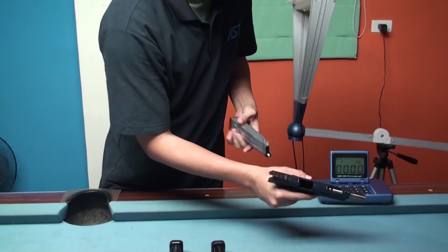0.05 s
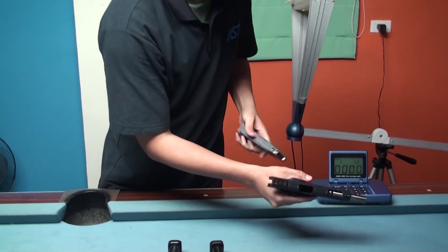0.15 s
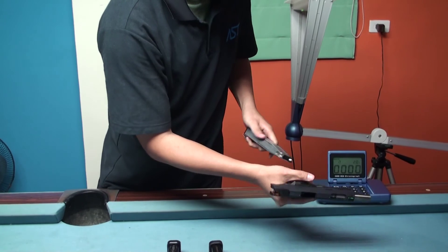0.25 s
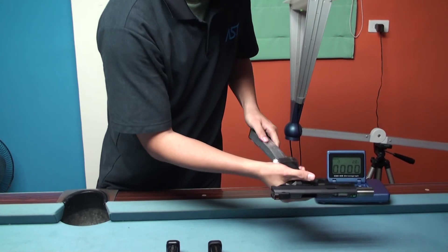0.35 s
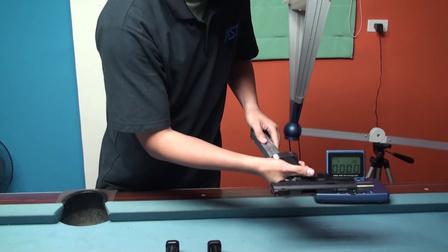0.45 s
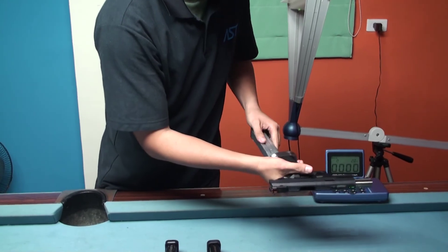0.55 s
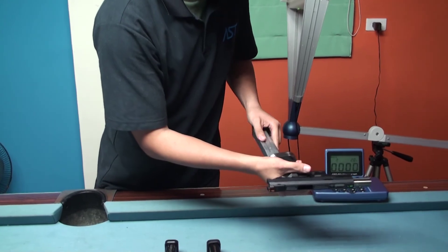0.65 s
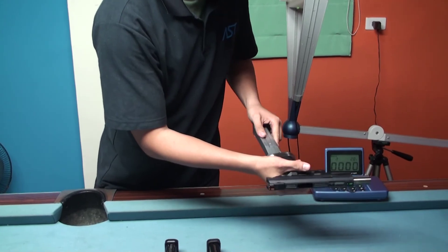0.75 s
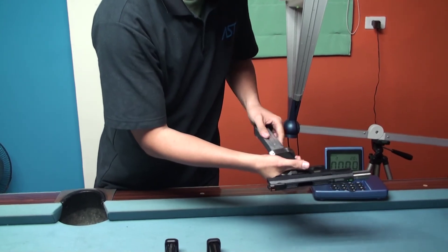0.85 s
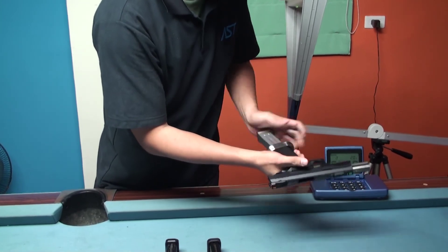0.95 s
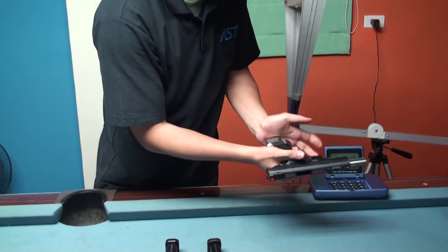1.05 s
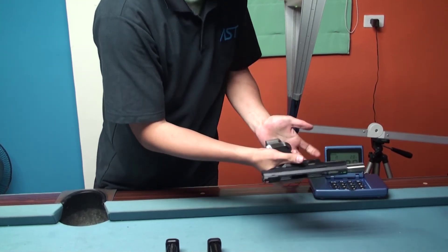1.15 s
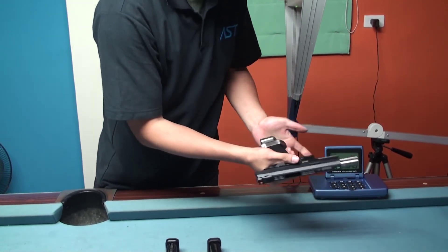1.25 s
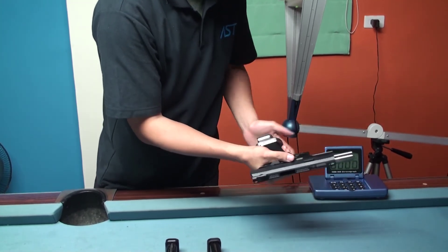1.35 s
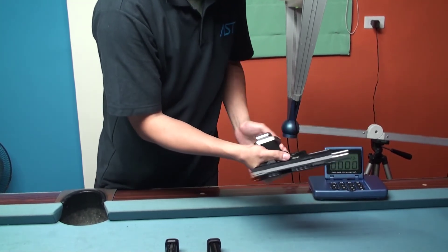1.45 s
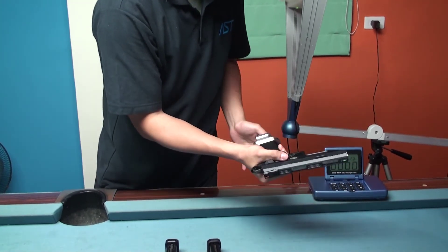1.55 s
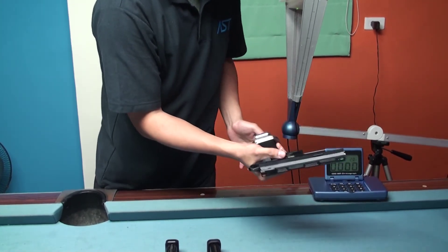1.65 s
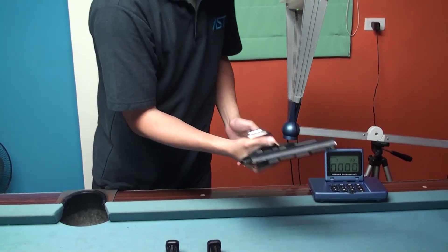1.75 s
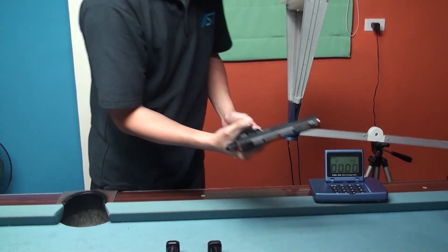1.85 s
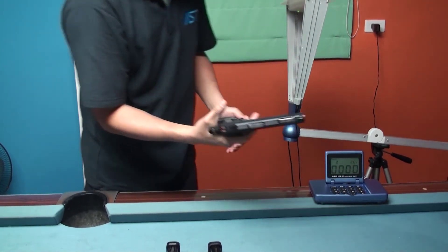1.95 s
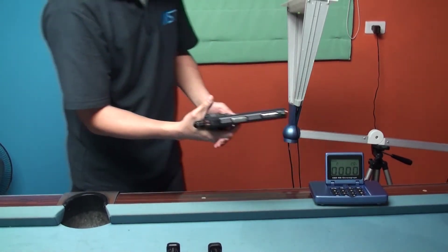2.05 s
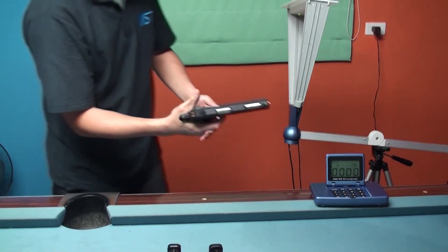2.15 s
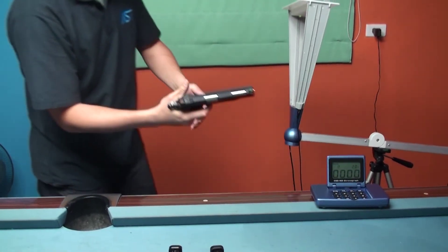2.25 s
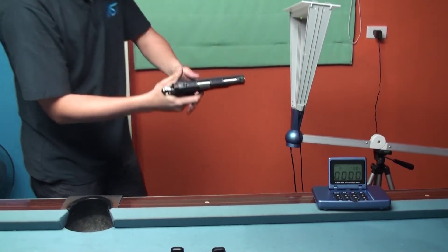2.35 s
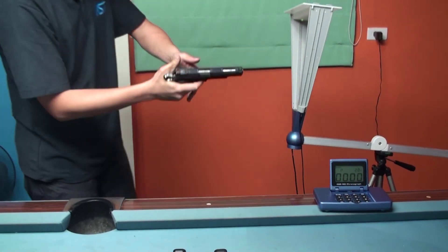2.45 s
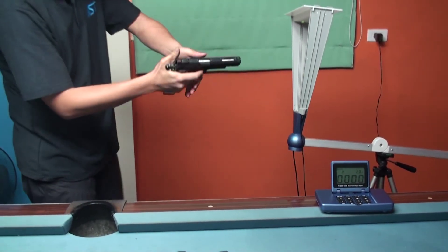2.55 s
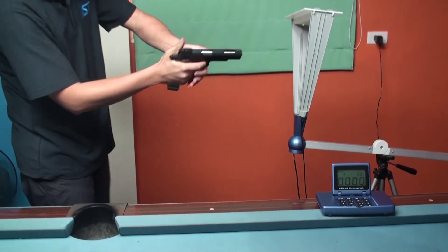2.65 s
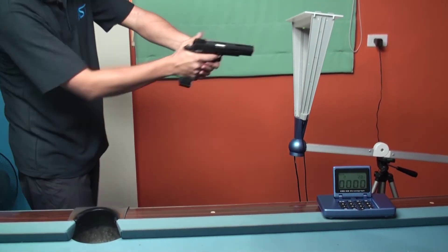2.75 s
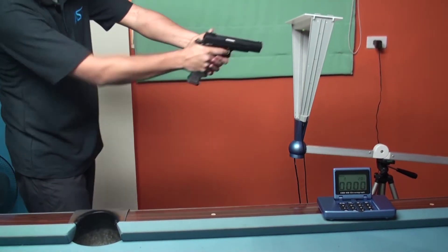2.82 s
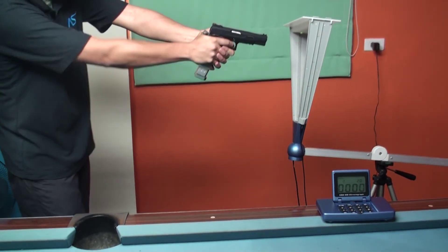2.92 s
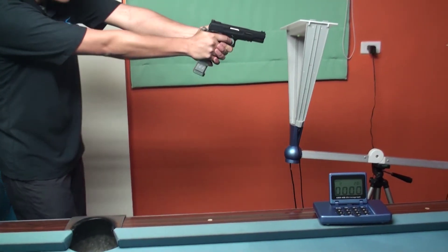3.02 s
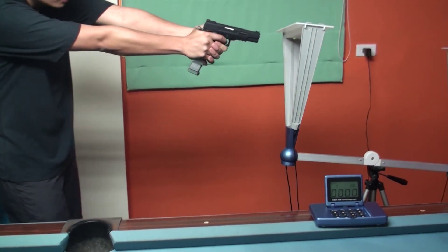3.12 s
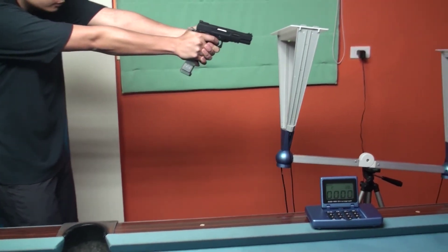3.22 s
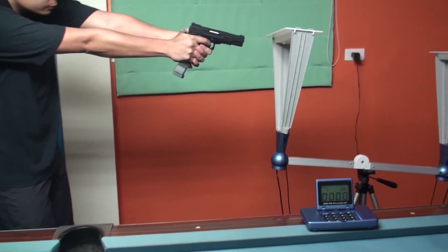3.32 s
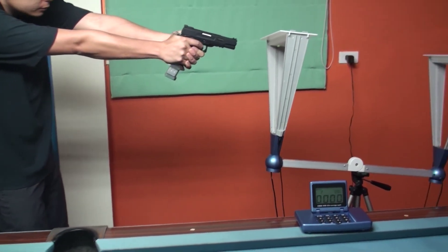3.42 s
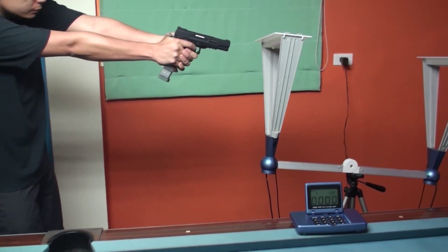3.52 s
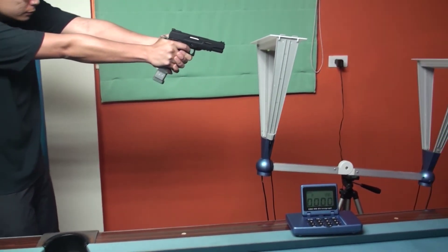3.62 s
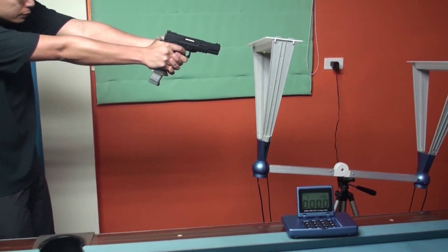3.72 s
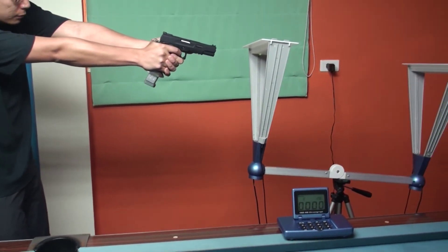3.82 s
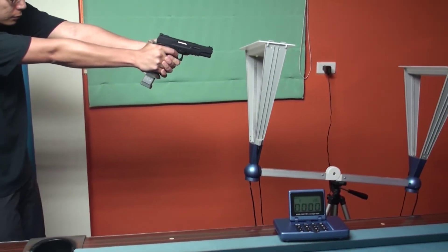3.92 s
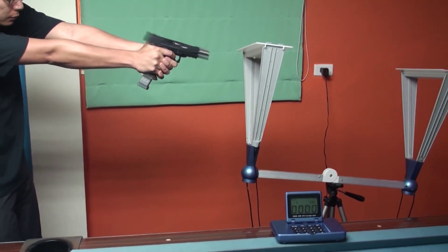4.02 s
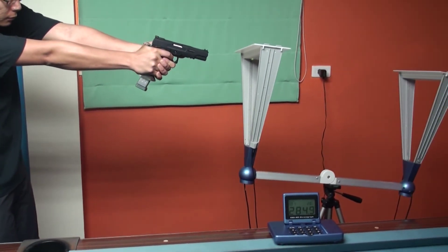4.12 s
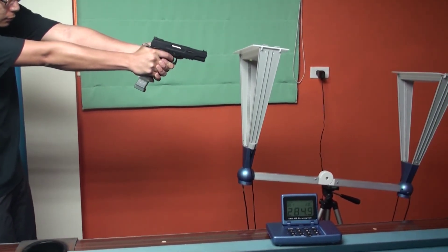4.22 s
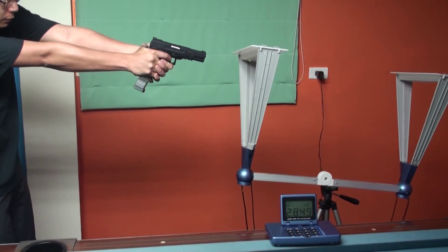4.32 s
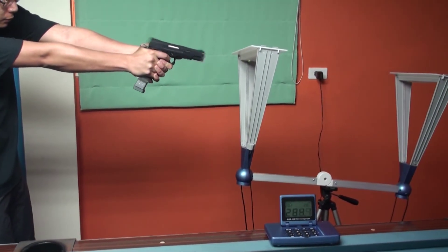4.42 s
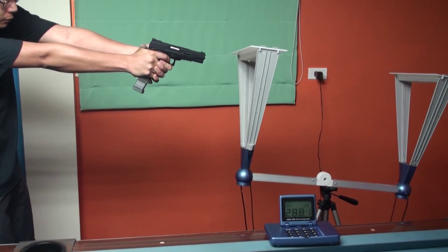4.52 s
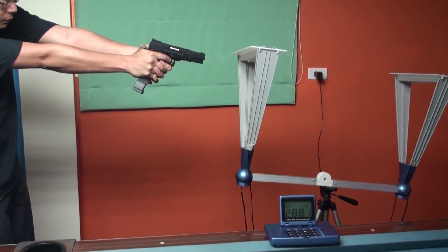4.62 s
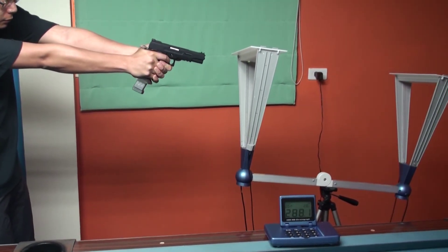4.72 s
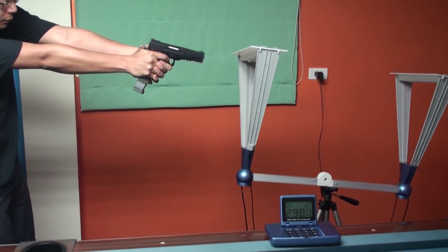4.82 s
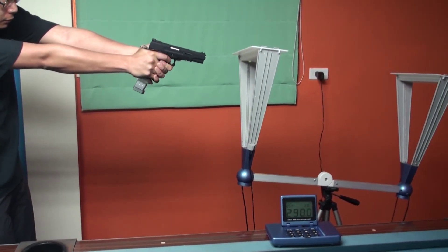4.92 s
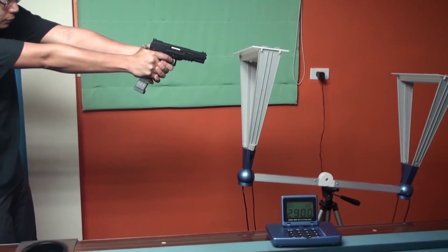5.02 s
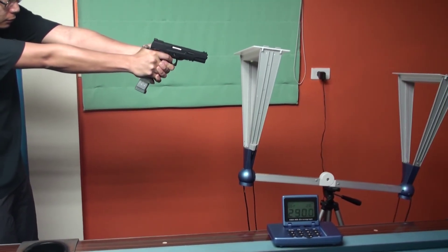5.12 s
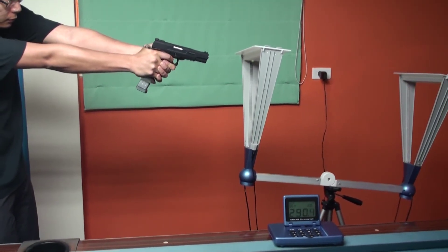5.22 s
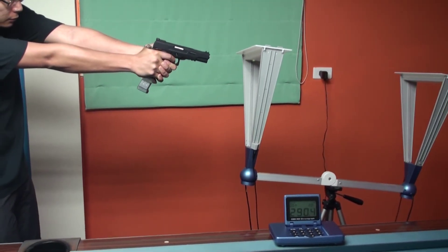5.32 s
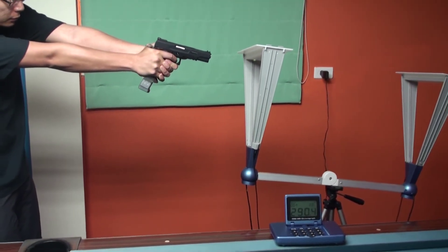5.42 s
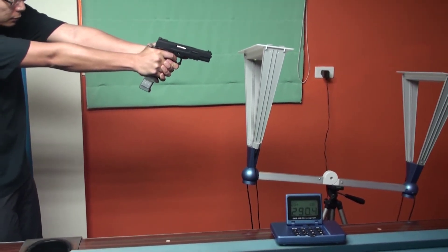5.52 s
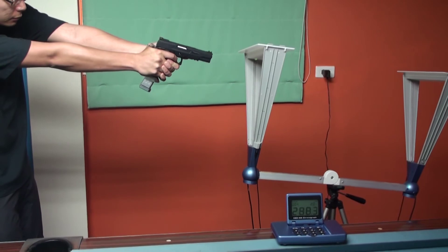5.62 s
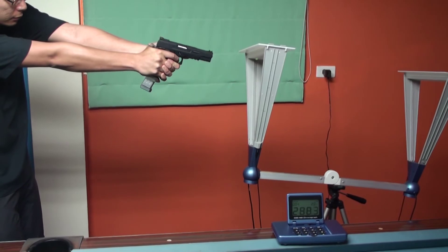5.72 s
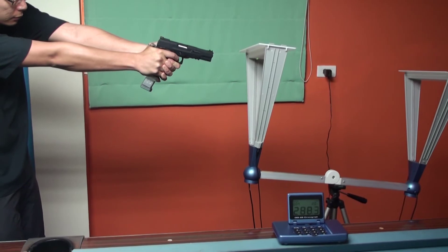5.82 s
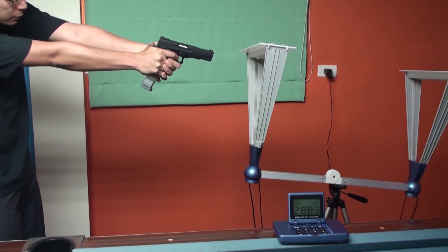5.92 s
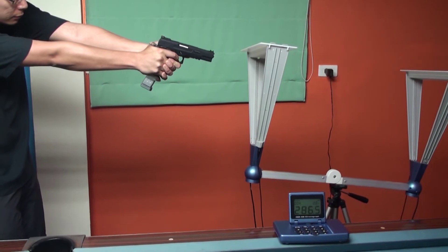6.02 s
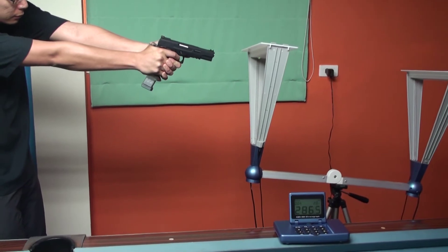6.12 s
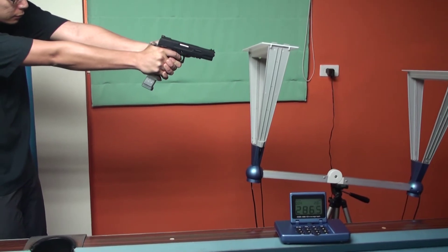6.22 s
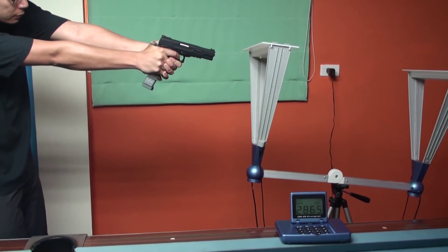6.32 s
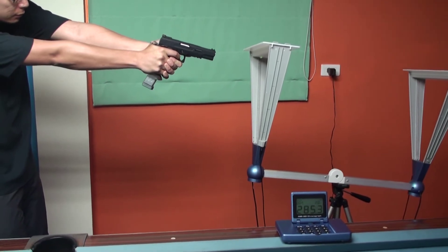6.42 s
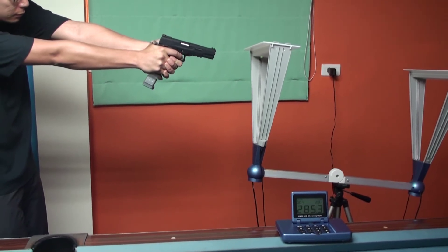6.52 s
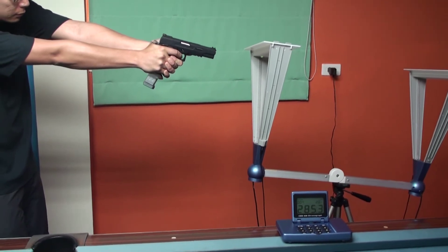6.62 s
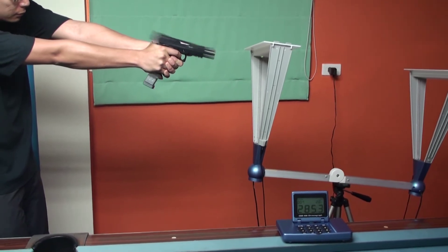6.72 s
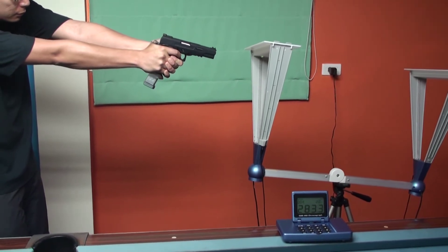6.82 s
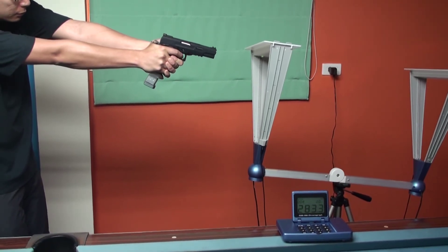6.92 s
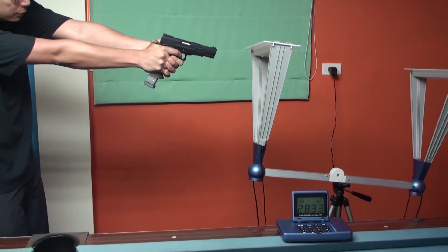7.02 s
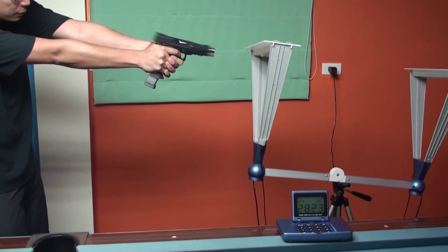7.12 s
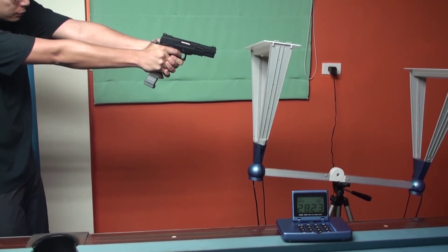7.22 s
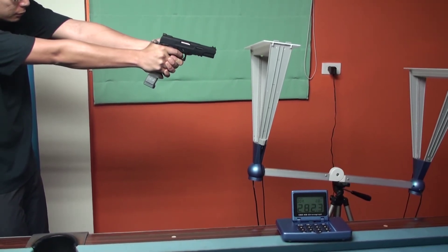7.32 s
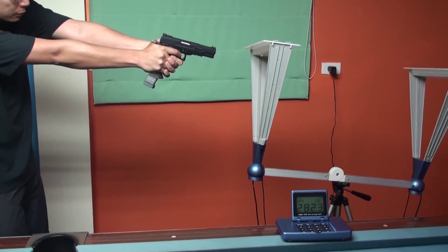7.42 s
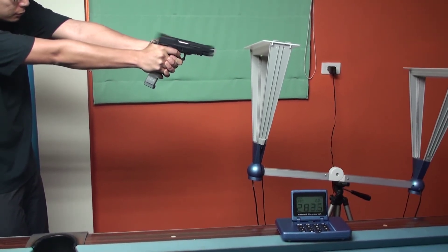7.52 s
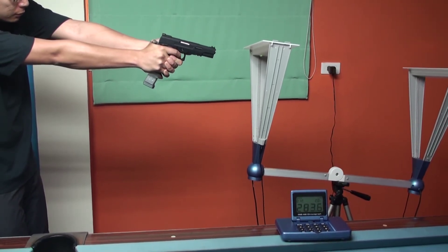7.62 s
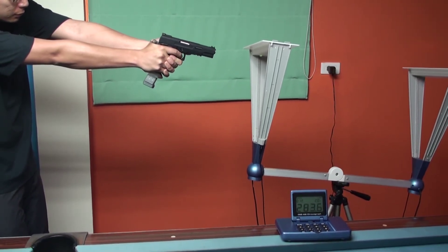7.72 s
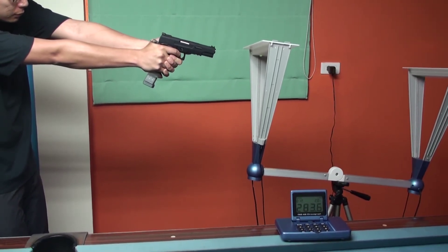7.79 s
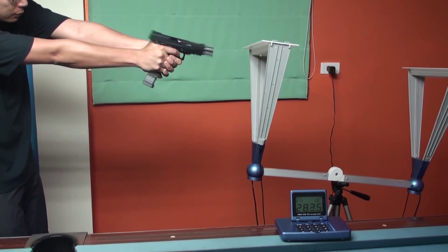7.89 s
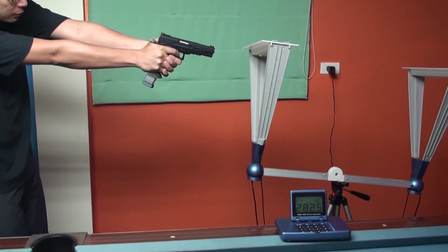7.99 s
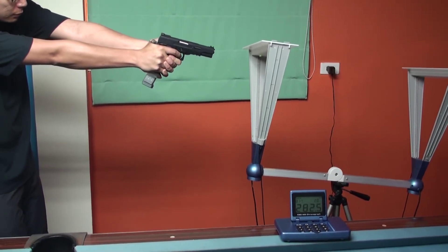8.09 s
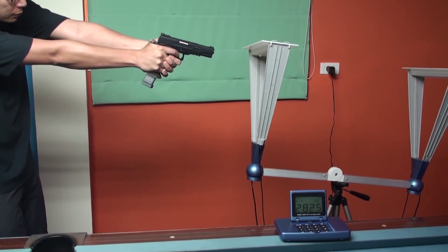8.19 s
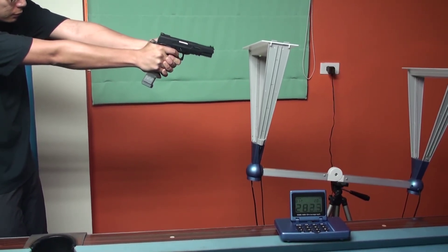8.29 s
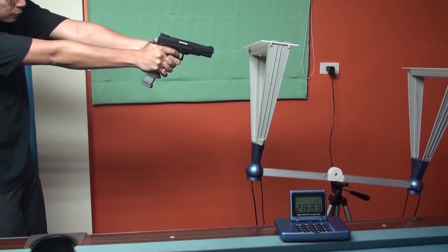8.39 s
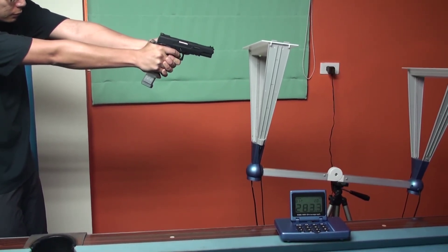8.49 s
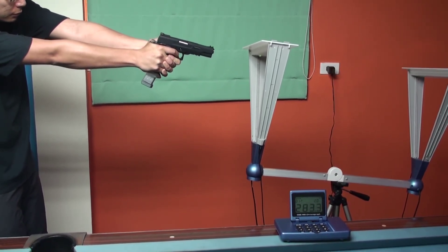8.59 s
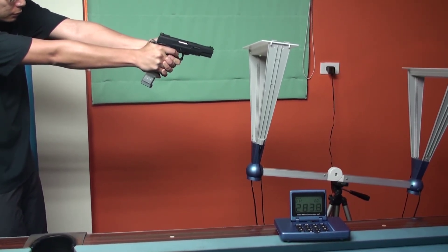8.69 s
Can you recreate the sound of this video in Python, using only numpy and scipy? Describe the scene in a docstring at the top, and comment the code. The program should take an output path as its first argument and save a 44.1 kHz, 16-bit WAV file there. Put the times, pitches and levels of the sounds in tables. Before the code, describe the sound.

After clicks of a magazine and slide, a gas airsoft pistol fires repeatedly, each pop carrying a bright clack and room echo.

```python
"""A gas airsoft pistol fires thirteen shots in a hard-walled room, after it is loaded and its slide dropped.
Each shot is a hammer click, a blast of expanding gas and impacts of the slide, which excite the metal's
normal modes; the blasts weaken as the gas cools. Room noise, a brief hum and sleeves lie underneath.
A fast limiter passes the first crack and flattens the bang, so the reverberation swells up behind it."""
import sys
import numpy as np
from scipy import signal
from scipy.fft import rfft, irfft, next_fast_len
from scipy.io import wavfile
from scipy.ndimage import uniform_filter1d

SR = 44100
rng = np.random.default_rng(int(sys.argv[2]) if len(sys.argv) > 2 else 0)


def master(y):
    """Save y as 16-bit WAV."""
    cut = np.clip(np.atleast_2d(y).T, -1, 1)
    pcm = np.round(cut * 32767)  # scale
    wavfile.write(sys.argv[1], SR, pcm.astype(np.int16))


N = 385875

# Spectra of room noise and rubbing cloth. Each row: frequency in Hz, relative level in dB.
AIR_SPECTRUM = [(15, -47.5), (25, -11), (64, -19), (108, -1.5), (190, 2.5), (217, -4), (285, 6),
                (335, -2.5), (531, -7), (575, -9.5), (887, -9), (1370, -12.5), (1560, -14.5), (3720, -23),
                (16000, -41)]
CLOTH_SPECTRUM = [(500, -11), (2000, -2), (4000, -3.5), (7000, -3), (11500, -5.5), (16000, -18)]
# Sleeves brushing as the arms rise. Each row: start in seconds, level in dB, decay time in seconds.
SLEEVE_BRUSHES = [(1.75, -54, 0.23), (2.08, -50, .19), (2.565, -41.5, .06), (2.801, -55.5, 0.26)]
# Early reflections. Each row: delay in seconds, relative gain.
REFLECTIONS = [(.0012, .6), (.0050, 0.29), (.0093, 0.38), (.0125, -0.34), (0.0146, 0.43), (0.022, 0.13)]
# Reverberation time of the room. Each row: frequency in Hz, T60 in seconds.
REVERB_TIMES = [(60, 0.32), (150, 0.62), (400, 0.59), (1000, 0.5), (2800, 0.49), (7000, 0.52),
                (11000, 0.45), (16000, 0.35)]
# Normal modes of room and pistol. Each row: frequency in Hz, relative level in dB, T60 in seconds.
STANDING_WAVES = [(138.9, -8, 0.79), (150.1, 2, 0.69), (279, 0.5, 0.51), (337.7, -2.5, 0.54),
                  (408, -10, 0.94), (668, 8.5, 0.34), (772, -23.5, 0.38), (840, -17, 0.33),
                  (878, 0.5, 0.26), (1078, 7.5, 0.46), (1610, -12, 0.74)]
METAL_MODES = [(2406, -12.5, 0.84), (2550, -7, 0.72), (2960, -4, .25), (3210, -12, 1), (4517, -22, 0.233),
               (4770, -26, 0.37), (5560, -12, .19), (6077, -14.5, 0.218), (6515, -15, .2),
               (6600, -11, 0.17), (7240, -13.5, .35), (7560, 22.5, 0.26), (8400, 20.5, 0.2),
               (8500, -10, 0.227), (9458, -8.5, .23), (11190, -11, .2)]
# Diffuse-field coherence between the microphones. Each row: frequency in Hz, coherence from 0 to 1.
COHERENCE = [(60, 0.2), (200, 0.27), (600, 0.53), (1400, 0.43), (7000, 0.35), (15000, 0.23)]
# The left channel is quieter, with little treble above about 11.5 kHz.
# Each row: frequency in Hz, level in dB relative to the right.
LEFT_BALANCE = [(60, -4), (110, -9), (200, -14), (380, -10), (700, -7.5), (1300, -6.5), (2400, -5.5),
                (8000, -5.5), (9800, -2), (11200, -1), (11900, -18), (16000, -24)]
# Impacts of loading. Each row: start in seconds, level in dB, main resonance in Hz, its lift in dB.
LOADING_KNOCKS = [(0.1196, -28, 4140, 14), (0.227, -37, 4130, 7), (0.5164, -25.5, 2590, 2),
                  (0.5252, -31.5, 6400, 15), (0.808, -38, 3800, 7), (0.8624, -19, 2150, 18),
                  (0.908, -19.5, 3650, 5), (0.9976, -21, 1126, 17), (1.0170, -21, 8660, 20),
                  (1.0231, -20, 3870, 10), (1.058, -10.5, 3400, 7), (1.078, -1, 2950, 5.5),
                  (1.5028, -4, 2390, 0), (1.5222, -0.5, 2410, 11), (1.839, -33, 3500, 4),
                  (2.93, -40, 3420, 11)]
# Magazine sliding up the grip, then slide along its rails.
# Each row: start in seconds, length in seconds, level in dB, rise over the stroke in dB.
LOADING_SCRAPES = [(.91, 0.19, -40.5, 8), (1.489, 0.011, -32, 11)]
# Spectra of a loading knock, the slide's clack and the blast. Each row: frequency in Hz, relative dB.
KNOCK_SPECTRUM = [(100, -31), (700, -16), (1300, -5.5), (1700, -4), (2500, 0), (4200, 0), (5500, 1),
                  (7300, -1), (8300, 0), (9500, -4), (11500, -3), (13000, -13), (16000, -17)]
CLACK_SPECTRUM = [(300, -29), (2000, -16), (4500, -11), (5800, -1), (6700, 12.5), (7500, 5), (9000, -7.5),
                  (11500, 4), (16000, -39)]
BLAST_SPECTRUM = [(30, -2), (65, -19), (105, -1), (150, 0), (200, -2), (280, 5.5), (400, 3.5), (570, 6.5),
                  (1100, 3.5), (1800, 1.5), (3000, 1.5), (7000, 4.5), (12000, 2.5), (16000, -1.5)]
# Slide impacts in one shot. Each row: nominal delay after the blast in seconds, relative level in dB.
SLIDE_CYCLE = [(.0005, 6.5), (.0095, 0), (0.0152, 0.5), (0.0225, -4), (0.038, 0)]
# The shots. Each row: time of the blast in seconds, level of the hammer click in dB.
SHOT_SEQUENCE = [(4.0519, -14), (4.4195, -17), (4.8178, -23), (5.2052, -10), (5.5890, -15), (5.9944, -32),
                 (6.3939, -22), (6.7603, -26), (7.1349, -33), (7.5282, -14), (7.9123, -22), (8.279, -36),
                 (8.674, -32)]

COLD_DB, WARM_DB, COOLING_SHOTS = -3.5, 12, 4.5  # the warm gas's excess level falls by 1/e in 4.5 shots
SLIDE_DB_PER_GAS_DB, SLIDE_TOP_DB, FIRST_SLIDE_DB = 2.1, 3, -20  # the first shot's clack is faint
CONTACT_S, RATTLE_S = 0.0021, 0.0054  # a harder knock rattles longer
GENTLE_TILT_DB, FORCE_TILT_DB = -5.5, 9  # per octave above 1 kHz: a harder knock is brighter


def amp(db):
    """Amplitude ratio of a level in decibels."""
    return 10 ** (np.asarray(db) / 20)


def unit_rms(x):
    """Normalisation to unit mean power."""
    return x / np.sqrt(np.mean(x ** 2) + 1e-20)


def curve_at(points, hz):
    """Interpolation on a logarithmic frequency axis."""
    frequencies, values = np.transpose(points)
    return np.interp(np.log(hz + 1), np.log(frequencies + 1), values)


def add(mix, start_s, sound):
    """Superposition: a sound adds to the mix from its start time."""
    part = mix[round(start_s * SR):][:len(sound)]
    part += sound[:len(part)]


def convolve(x, response):
    """Convolution: the output of a linear system with a one- or two-channel impulse response."""
    return signal.fftconvolve(np.atleast_2d(x), np.atleast_2d(response), axes=1)[:, :N]


def colour(db_at, size=4096):
    """Minimum-phase response of unit energy, with the spectral shape db_at(Hz)."""
    log_gain = np.log(amp(db_at(abs(np.fft.fftfreq(size, 1 / SR)))))
    spectrum = np.exp(np.conj(signal.hilbert(log_gain)))
    response = np.fft.ifft(spectrum).real[:size // 2]
    return response / np.linalg.norm(response)


def burst(decay_s):
    """Broadband transient: decaying noise whose energy is proportional to its decay time."""
    age = np.arange(int(7 * decay_s * SR) + 2) / (decay_s * SR)
    white = np.random.default_rng(rng.integers(2 ** 30)).standard_normal(len(age))
    rush = white * np.exp(-age) * (1 - np.exp(-10 * age))
    for _ in range(4):  # keeping only the phase flattens the spectrum
        phase = np.angle(rfft(rush, 2 * len(age)))
        rush = irfft(np.exp(1j * phase))[:len(age)]
    return rush * np.sqrt(decay_s * SR / 2)


def ring(modes):
    """Free vibration: a sum of damped normal modes, with unit energy."""
    t = np.arange(SR) / SR
    sound = sum(amp(db - 60 * t / t60) * np.sin(2 * np.pi * (hz * t + rng.random()))
                for hz, db, t60 in modes)
    return sound / np.linalg.norm(sound)


def swell(start_s, rise_s, decay_s):
    """Envelope with a smooth rise to one and an exponential decay."""
    age = np.arange(N) / SR - start_s
    rise = np.sin(np.pi / 2 * np.clip(age / rise_s, 0, 1)) ** 2
    return rise * np.exp(-np.maximum(age - rise_s, 0) / decay_s)


def diffuse(pair):
    """Partial coherence: sound from all sides is partly alike at two close microphones."""
    common, separate = rfft(pair)
    coherence = np.clip(curve_at(COHERENCE, np.fft.rfftfreq(pair.shape[1], 1 / SR)), 0, 1)
    left = coherence * common + np.sqrt(1 - coherence ** 2) * separate
    return irfft([left, common], pair.shape[1])


def diffuse_noise(spectrum):
    """Stationary noise of a diffuse field, with a given spectral shape."""
    white = diffuse(rng.standard_normal((2, N)))
    gain = amp(curve_at(spectrum, np.fft.rfftfreq(N, 1 / SR)))
    return unit_rms(irfft(rfft(white) * gain, N))


def hum(pitch_hz=188, waver_hz=4, peak_db=-48.5):
    """A low tone swells once and fades; random frequency modulation makes it waver."""
    waver = unit_rms(uniform_filter1d(rng.standard_normal(N), size=4000))
    tone = unit_rms(np.sin(2 * np.pi * np.cumsum(pitch_hz + waver_hz * waver) / SR))
    return amp(peak_db) * swell(start_s=2.57, rise_s=0.1, decay_s=0.8) * tone


def sleeves(rise_s=0.17):
    """Friction of cloth gives broadband noise that swells with each brush."""
    rubbing = sum(amp(db) * swell(start_s, rise_s, decay_s) for start_s, db, decay_s in SLEEVE_BRUSHES)
    return rubbing * diffuse_noise(CLOTH_SPECTRUM)


def reverberation(build_s=0.0014, modes_db=-22, lowest_hz=85):
    """Reflections grow denser and decay exponentially in each band, over the room's standing waves."""
    t = np.arange(SR) / SR
    density = np.minimum(0.13 + 8 * t, 1)
    arrivals = rng.standard_normal((2, SR)) * (rng.random((2, SR)) < density)
    hz, age, bands = signal.stft(diffuse(arrivals) / np.sqrt(density), SR, nperseg=256)
    decay = amp(-60 * age / curve_at(REVERB_TIMES, hz)[:, None])
    tail = signal.istft(bands * decay, SR, nperseg=256)[1][:, :SR]
    bass_cut = signal.butter(2, lowest_hz, "high", fs=SR, output="sos")
    tail = signal.sosfilt(bass_cut, tail)  # a small room holds little deep bass
    rise = 1 - np.exp(-(t / build_s) ** 2)
    return rise * (tail / np.linalg.norm(tail[1]) + amp(modes_db) * ring(STANDING_WAVES))


def room(x, tail, early_db, tail_db):
    """Multipath propagation: direct sound, early reflections off table and walls, reverberant tail."""
    response = amp(tail_db) * tail
    response[:, 0] += 1
    for delay_s, gain in REFLECTIONS:
        for side in response:
            side[round((delay_s + rng.uniform(0, 0.0002)) * SR)] += amp(early_db) * gain
    return convolve(x, response)


def metal(blows, ring_db):
    """Impact excitation: each blow is followed by the ringing of the pistol's metal parts."""
    return blows + amp(ring_db) * convolve(blows, ring(METAL_MODES))[0]


def knocks(width_hz=230):
    """Impacts as magazine and slide are tapped and lock: greater force gives a longer, brighter knock."""
    blows = np.zeros(N)
    for start_s, db, resonance_hz, lift_db in LOADING_KNOCKS:
        force = amp(db)
        tilt_db = GENTLE_TILT_DB + FORCE_TILT_DB * force
        contact = colour(lambda hz: curve_at(KNOCK_SPECTRUM, hz)
                         + tilt_db * np.log2(np.maximum(hz, 1000) / 1000)
                         + lift_db / (1 + ((hz - resonance_hz) / width_hz) ** 2))
        rattle = burst(CONTACT_S + RATTLE_S * force)
        add(blows, start_s, force * signal.fftconvolve(rattle, contact))
    return blows


def scrapes():
    """Sliding friction: metal catches unevenly on metal, growing louder along the stroke."""
    friction = np.zeros(N)
    contact = colour(lambda hz: curve_at(KNOCK_SPECTRUM, hz) - hz / 1000)  # duller by 1 dB per kHz
    for start_s, length_s, db, rise_db in LOADING_SCRAPES:
        catches = rng.standard_normal(SR)[:round(length_s * SR)] ** 3
        push = amp(np.linspace(0, rise_db, len(catches)))
        add(friction, start_s, amp(db) * signal.fftconvolve(unit_rms(push * catches), contact))
    return friction


def firing(hammer_lead_s=0.0054, sear_lead_s=0.0086, sear_db=-27, muzzle_db=4, vent_db=-13, clack_db=-2):
    """Gas expansion: the sear slips, the hammer opens the valve, gas bursts out and drives the slide."""
    gas, blows = np.zeros((2, N))
    muzzle_pulse = burst(decay_s=0.0018)  # the same pulse shape leaves the barrel each time
    for fired, (shot_s, hammer_db) in enumerate(SHOT_SEQUENCE):
        gas_db = COLD_DB + WARM_DB * np.exp(-fired / COOLING_SHOTS)  # each shot chills the magazine
        slide_db = min(SLIDE_DB_PER_GAS_DB * gas_db, SLIDE_TOP_DB) if fired else FIRST_SLIDE_DB
        add(blows, shot_s - sear_lead_s, amp(sear_db) * burst(decay_s=0.019))
        add(blows, shot_s - hammer_lead_s, amp(hammer_db) * burst(decay_s=0.001))
        add(gas, shot_s, amp(gas_db + muzzle_db) * muzzle_pulse)
        add(gas, shot_s + 0.009, amp(gas_db + vent_db) * burst(decay_s=0.0081))  # the open breech vents
        for delay_s, db in SLIDE_CYCLE:
            impact_s = shot_s + delay_s * rng.uniform(0.93, 0.98)
            add(blows, impact_s, amp(slide_db + db + clack_db) * burst(decay_s=0.0012))
    blast = convolve(gas, colour(lambda hz: curve_at(BLAST_SPECTRUM, hz)))[0]
    clack = convolve(blows, colour(lambda hz: curve_at(CLACK_SPECTRUM, hz)))[0]
    return blast, metal(clack, ring_db=-30)


def scene(air_db=-42):
    """Direct-to-reverberant ratio: loading is close by; the blast points away and returns as echo."""
    tail = reverberation()
    blast, clack = firing()
    blasts = room(blast, tail, early_db=-7.5, tail_db=10.5)
    clacks = room(clack, tail, early_db=1.5, tail_db=-1.0)
    handling = metal(knocks() + scrapes(), ring_db=-25.5)
    loading = room(handling, tail, early_db=-6.0, tail_db=-1.5)
    background = hum() + amp(air_db) * diffuse_noise(AIR_SPECTRUM) + sleeves()
    return background + loading + clacks + blasts


def smoothed(x, time_constant_s):
    """Exponential averaging by a one-pole low-pass filter."""
    pole = np.exp(-1 / (time_constant_s * SR))
    return signal.lfilter([1 - pole], [1, -pole], x)


def limiter(x, threshold_db=-14, ratio=14, attack_s=0.0006, ahead_s=0.00014,
            settle_s=0.011, overshoot_db=2, recovery_db_per_s=330):
    """Compression: one gain for both sides drops fast, settles the last dB slowly, recovers steadily."""
    t = np.arange(N) / SR
    power = smoothed((x ** 2).mean(0), attack_s)
    over_db = np.maximum(10 * np.log10(power + 1e-12) - threshold_db, 0)
    recovery_db = t * recovery_db_per_s
    held_db = np.maximum.accumulate(over_db + recovery_db) - recovery_db
    goal_db = held_db * (1 - 1 / ratio)
    duck_db = np.clip(smoothed(goal_db, settle_s), goal_db - overshoot_db, goal_db)
    advanced_db = np.interp(t + ahead_s, t, duck_db)
    return x / amp(uniform_filter1d(advanced_db, size=16))


def record(dry, saturation=0.85, band_edge_hz=15800):
    """The left channel is quieter and loses its top treble; then limiting, saturation, a band limit."""
    padded = next_fast_len(N + SR, True)
    left = amp(curve_at(LEFT_BALANCE, np.fft.rfftfreq(padded, 1 / SR)))
    balance = np.array([left, np.ones_like(left)]) * 2 / (1 + left)
    heard = irfft(rfft(dry, padded) * balance, padded)[:, :N]
    limited = limiter(heard)
    rounded = limited / (1 + (limited / saturation) ** 4) ** 0.25
    low_pass = signal.firwin(511, band_edge_hz, window=("kaiser", 9), fs=SR)
    return signal.oaconvolve(rounded, low_pass[None], "same")


dry = scene()
out = record(dry)
master(out)
```